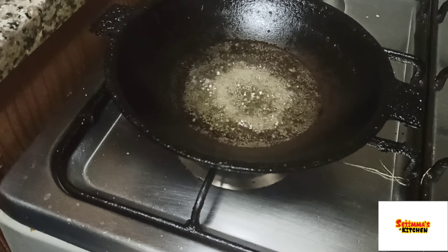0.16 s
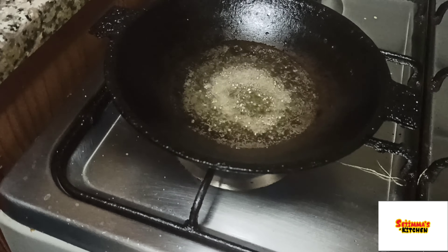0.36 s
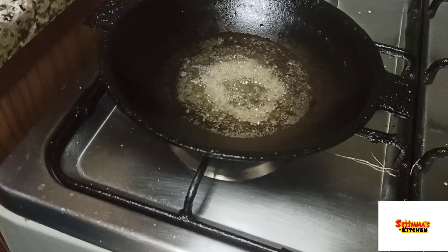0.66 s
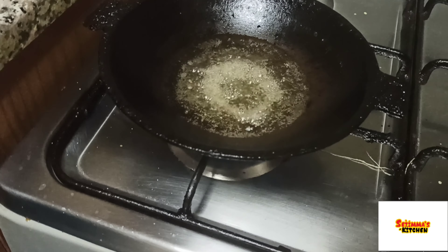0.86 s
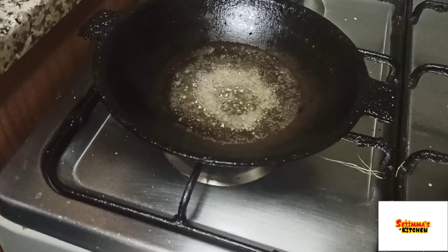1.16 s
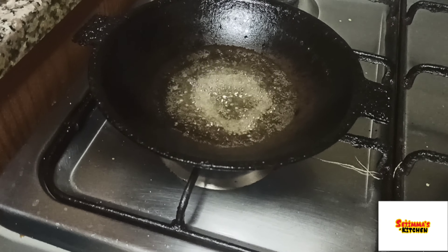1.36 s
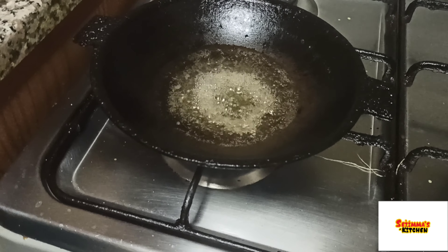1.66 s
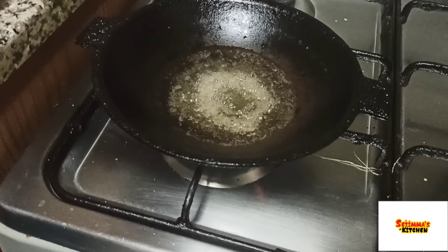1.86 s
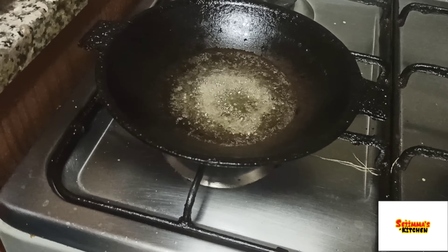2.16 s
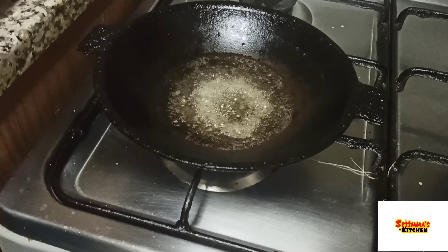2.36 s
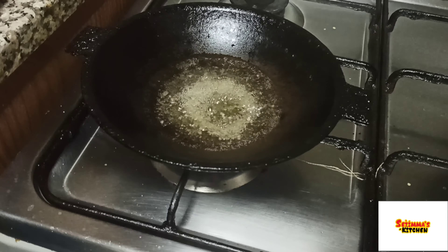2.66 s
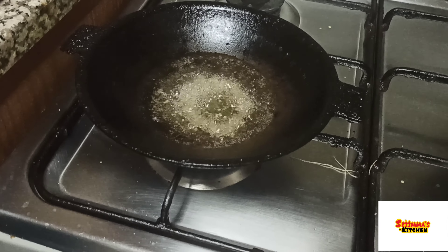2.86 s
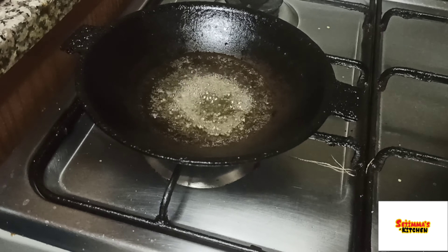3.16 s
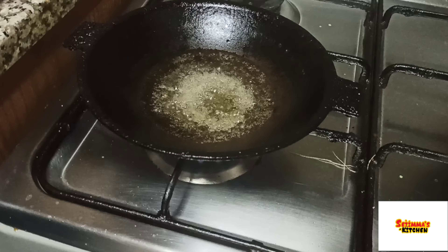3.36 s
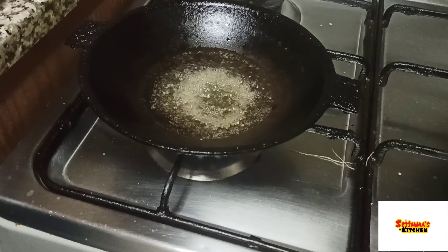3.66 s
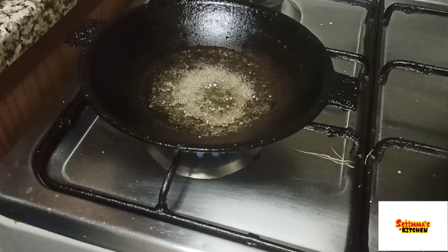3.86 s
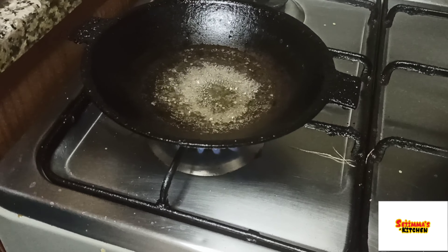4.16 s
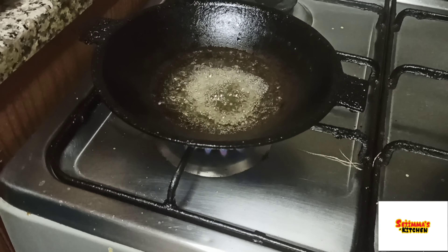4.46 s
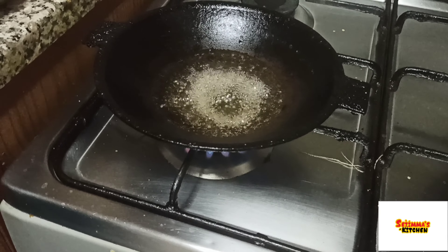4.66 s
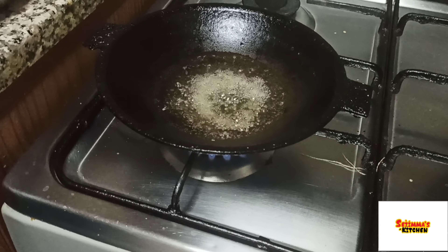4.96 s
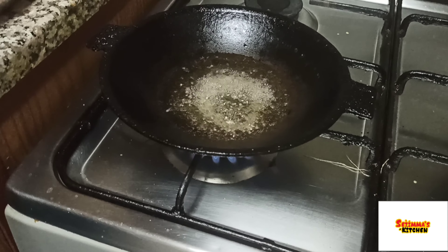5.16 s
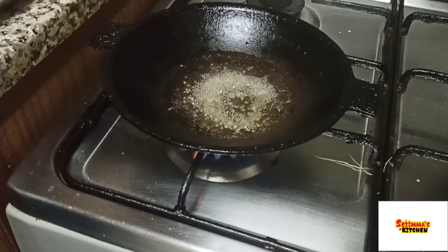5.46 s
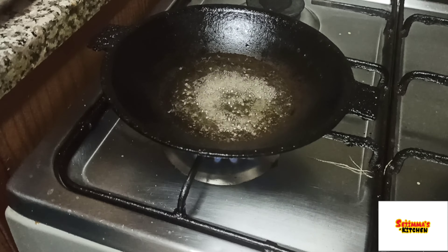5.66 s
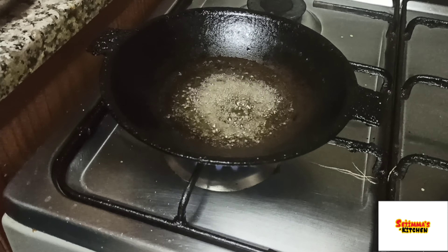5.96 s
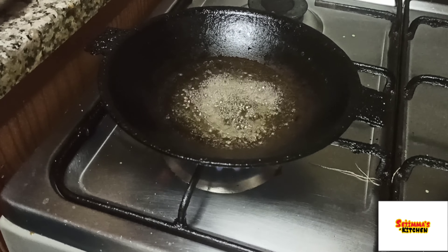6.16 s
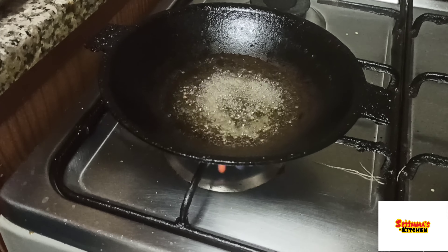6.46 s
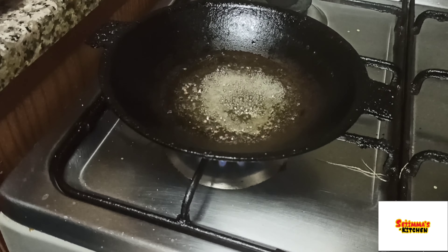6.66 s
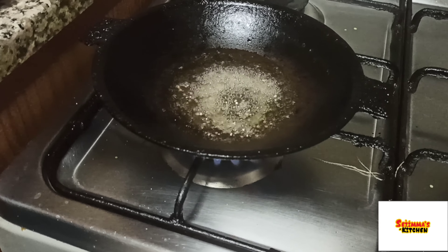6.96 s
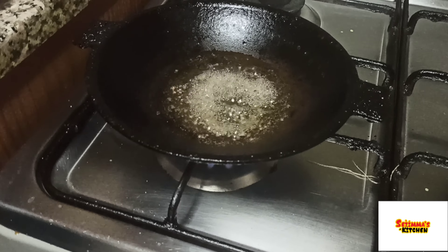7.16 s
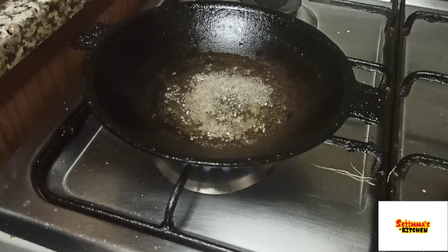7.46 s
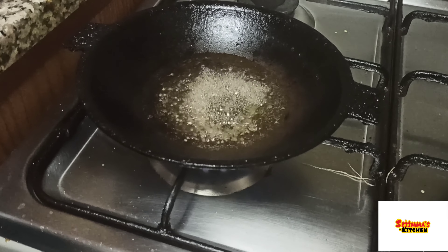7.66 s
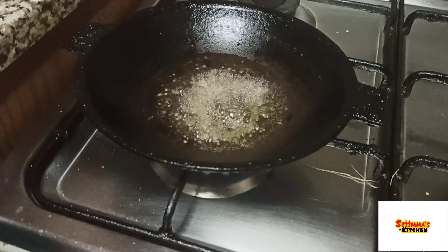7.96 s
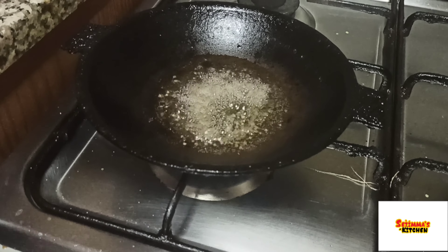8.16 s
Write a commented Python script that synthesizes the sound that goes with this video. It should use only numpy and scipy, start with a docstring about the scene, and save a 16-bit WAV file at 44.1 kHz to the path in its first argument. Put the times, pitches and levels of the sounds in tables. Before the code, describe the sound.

Mustard seeds pop in hot oil in an iron wok over a gas flame, heard in stereo from about an arm's length in a small hard-walled kitchen. A fine bubbling sizzle, a low soft burner roar, a faint breathy gas note and a mains hum lie quietly underneath throughout. Strong snaps open the scene at 0 to 0.1 s, with a short steam hiss; then sparse, uneven pops and small ticks follow, with harder cracks near 1.05, 2.6 and 3.45 s. Brief steam spits come around 2.6 and 5.3 s. From 3.7 s the crackle rapidly thickens and the sizzle rises. A soft low thump sits under a hard pop at about 4.6 s. Dry cracks, short ringing pocks, wet plops and sputters overlap ever more densely until the sound stops at about 8.3 s, still popping hard.

```python
"""Mustard seeds pop in hot oil in an iron wok on a gas stove, heard from about an arm's length in a small kitchen.
From the start a fine sizzle of bubbles lies over the burner's soft roar, a breathy gas note and a mains hum.
Pops come singly at first: each husk cracks and rings its pocket of vapour, and a few seeds vent a jet of steam.
From 3.7 s the pops crowd together and the sizzle swells; one low thump falls at about 4.6 s.
The wok colours every pop, and the kitchen walls scatter the sounds of the wok."""
import sys
import numpy as np
from scipy import signal
from scipy.fft import rfft, irfft, next_fast_len
from scipy.io import wavfile
from scipy.ndimage import uniform_filter1d

SR = 44100
rng = np.random.default_rng(int(sys.argv[2]) if len(sys.argv) > 2 else 0)


def put_to_file(sound):
    """Save the sound as 16-bit audio at rate SR, in the file named by the first command-line argument."""
    columns = np.atleast_2d(sound).T  # one column per channel
    safe = np.clip(columns, -1, 1)
    whole_steps = np.round(safe * 32767)
    wavfile.write(sys.argv[1], SR, whole_steps.astype(np.int16))


N = 366898
TIME = np.arange(N) / SR
# frequencies [Hz] for full-length sounds and for single pops; the added 1 Hz avoids log(0)
FREQ = np.fft.rfftfreq(2 * next_fast_len(N // 2 + 1), 1 / SR) + 1
SHORT_FREQ = np.fft.rfftfreq(2048, 1 / SR) + 1
BURST_FROM_S = 3.7  # the oil reaches the heat at which most seeds split
CALM_PER_S, RUSH_PER_S = 9, 24  # small pops per second before then, and added then


def seeds(gain_db=1.5, early_db=-19, early_s=.004):
    """The loud pops; from 3.7 s a much fainter pop comes a few milliseconds before each."""
    # the loudest bursting seeds: (time [s], crack level [dB], crack tilt [dB per octave], cavity pitch [Hz],
    # cavity ring against the crack [dB], plop of oil against the crack [dB], sputter against a unit click [dB])
    loud_pops = [(0.0049, 0, 6, 776, 3, -7, -26), (0.0705, 1.5, 1, 3500, 10, -20, -25),
                 (0.1248, -16.5, -6, 2750, 16.5, -6, -12), (0.236, -17, -5, 6000, 4, -3, -12),
                 (0.272, -19.5, 6.5, 6100, 14, 2, 0), (0.456, -6, -1.5, 5700, 3.5, -15, -15),
                 (0.5212, -25, 11, 3820, 22.5, 15, -16), (0.5306, -21.5, 2, 3640, 19, 8, -17),
                 (0.667, -19, 0, 2790, 10, 14.5, -10), (0.7271, -13.5, -2, 2300, 8, -8, 1),
                 (0.7406, -14.5, -1.5, 4330, 15, -11, -16), (0.8476, -21, 7, 5540, 0, 3, -14),
                 (1.0505, 2, 1.5, 3300, 9, -0.5, -8.5), (1.056, -15, 0, 1500, 2, -6, 3),
                 (1.615, -3.5, -0.5, 2100, 5.5, 7, -12), (1.8248, -8, 6, 3160, 12.5, -1, -6),
                 (1.872, -18, 7.5, 810, 1, -10, -11), (1.9399, -20, 6, 4800, 7, -12, -12),
                 (2.027, -7, -3, 3680, 2.5, -15, -10), (2.195, -18, -7.5, 6210, 8, -7, 1),
                 (2.2171, -13, 6.5, 3240, 17.5, -7, -24), (2.244, -18, -5, 6300, 14.5, 15.5, 5),
                 (2.348, -4.5, 7, 3340, 13, -19, -21), (2.5338, -25, 12.5, 6960, 22, -1, -21),
                 (2.5753, -16, -5.0, 2220, 15.5, 11, -16), (2.6075, -17.5, 4, 5450, 11, -12, -14),
                 (2.633, 1.5, 5.5, 810, -1, -7, -14), (2.6869, -1.5, -3.5, 6290, 0, -1, -6),
                 (2.7757, -17.5, -3, 4630, 5, -2, -14), (2.935, -3.5, -2, 3330, 6, 2, -28),
                 (3.0263, -16.5, 1, 4200, -5, -8, -16), (3.2122, -17, 2, 2000, 4, -8, -14),
                 (3.332, -15, 10.5, 3560, 18.5, -4, -18), (3.3814, -3, -3, 1590, 8.5, 6.5, -21),
                 (3.4585, 2.5, -1.5, 1790, 8, -9, -14), (3.5389, -12, 10.5, 4020, 30, -12, -35),
                 (3.5412, -21, 6, 3500, 16, -12, -22), (3.792, -26.5, 1, 4200, 13, -10, -12),
                 (4.016, -11.5, -3.5, 3200, 6.5, -5, -9), (4.0895, -24, 5, 4110, 17.5, -3, -19),
                 (4.104, -9.0, -3, 850, 16.5, -9, 1), (4.123, -10.5, -3, 5950, 10, -7, -18),
                 (4.2488, -12.5, -5, 9000, 9.5, -7, -5), (4.2745, -16, 1, 2000, 7, -4, -14),
                 (4.332, -5.5, 0.5, 1130, 10, -10, 1), (4.3795, -9.5, -2, 4970, 9.5, -15, -6),
                 (4.4374, -2, -2.5, 3520, -1, 4, -4), (4.4694, 4, -3.5, 1880, 11, -13, -16),
                 (4.5063, -9, 0.5, 4020, 7, -10, -21), (4.5617, 1.5, -0.5, 1500, 12, -9, -17),
                 (4.5653, 2.5, 1, 4540, 10.5, -14, -22), (4.635, 2.5, -0.5, 2460, 11, -12, -4),
                 (4.681, -9.5, -1.5, 2540, 10, 0, -13), (4.7217, -11, 0.5, 5040, 17.5, 18, -20),
                 (4.731, -7, -2, 2370, 4, -11, -19), (4.7867, -21, -9.5, 825, 24, 5, -12),
                 (4.884, -24, 7, 2100, 26, -14, -9), (4.903, -10.5, 6, 2860, 15, -13, -21),
                 (4.913, -3, -1.5, 1370, 13, -10, -14), (5.065, -9.5, -7, 5370, 11, 14, -6),
                 (5.0748, 2, -0.5, 4810, 3.5, 4, -26), (5.1687, -8.5, -2, 5440, 9, 11.5, -4),
                 (5.207, -5.5, -2, 3300, 3, 0, -7), (5.226, -14, 3, 5250, 10, 1, -14),
                 (5.2591, 0, 7, 810, -8, -4, -13), (5.3766, -3.5, -2, 3660, 4.5, 7, -7.5),
                 (5.541, -22, -8.5, 7140, 16, -13, -5), (5.5737, -3.5, 3, 2060, 9, -3, -8),
                 (5.5981, -7, 0, 5860, 13.5, 4, -26), (5.674, -6.5, -1.5, 1730, 13.5, -11, 1),
                 (5.7105, -5, -1.5, 2060, 10.5, -14, -4), (5.7954, -11.5, 2, 6270, 12.5, -3, -14),
                 (5.828, -6, 0, 1850, 7, -15, -8), (5.862, -1, 1, 2400, 2, 13, -14),
                 (5.9184, -20, -1, 3150, 14, 17, -4), (5.9588, -22.0, 9, 4970, 26.5, -8, -14),
                 (5.983, 4.5, -1.5, 1730, 3, 6, -28), (6.0037, -12, 4.5, 3700, 10, -8, -16),
                 (6.065, 0, 1, 8000, -3, -18, -23), (6.1194, -2.5, 3, 7550, 6, -20, -16),
                 (6.155, -1.5, 1.5, 3560, 6.5, -3, -16), (6.18, -9.5, -3.5, 810, 13, -11, -4),
                 (6.233, -13.5, -6, 2330, 15, 14, -10), (6.2438, -21, 7.5, 2130, 19.5, 3, -8),
                 (6.3856, -9, -1.5, 2400, 1, -6, -12), (6.426, 0, -1, 2630, 4.5, 0.5, -2),
                 (6.4914, -6, -4.5, 1800, 5, -11, -18), (6.571, 0.5, -0.5, 1550, 11.5, -14, -13),
                 (6.635, -10.5, 0, 3550, -2, 9, -7), (6.679, -1, 2, 3200, 9.5, -15, -8),
                 (6.6842, -2, 8.5, 2590, 7, -15, -4), (6.7123, -8, -6, 4620, 13.5, 17, -11),
                 (6.7476, -9.5, -5, 3180, 17, -8, -23), (6.799, -4, -3, 1020, 10, -10, -2),
                 (6.8103, -13.5, 6, 5800, 17, -1, -9), (6.8235, -9, 5, 880, 24.5, -7, -15),
                 (6.886, -8.5, -1.5, 2050, 5, -5, -18), (6.9358, -2, 1, 5100, 11, -13, -12),
                 (6.9908, -10, 2, 8190, 8, -15, 5), (7.0198, -7, -3, 2900, 9, 6.5, -15),
                 (7.093, -14, -3, 3870, 9, -3, -10), (7.1122, -13, 0, 1800, 7, 4, -18),
                 (7.131, -13, -2.5, 800, 22.5, -3, -13), (7.1338, -5, -4, 1760, 12.5, 3, -3),
                 (7.223, -10, 5, 4270, 19, 1, -6), (7.251, -10.5, 3, 4700, 12, 2, -10),
                 (7.301, -2, -2.5, 3640, 8, 6, -6), (7.3778, -10.5, -3.5, 2270, 19.5, 13, 13),
                 (7.4, -0.5, -2, 3050, 5, -9, -15), (7.4458, -3, 0, 1500, 14, -11, -16),
                 (7.4605, -5.5, -4.5, 5200, 3, 9, -15), (7.468, -3.5, -2.5, 3600, 10.5, -7, -2),
                 (7.5065, -6, 0.5, 3100, 9, -15, -16), (7.5366, -12.5, 8, 3380, 18, -1, -16),
                 (7.5934, -2, 1, 1900, 9.5, -15, 7), (7.622, -3, 0.5, 1650, 7.5, -15, -1),
                 (7.6728, -9, -4, 1550, 7, -13, -17), (7.6959, 1, 5.5, 4670, 11.5, -21, -20),
                 (7.751, -17, -7, 5790, 17, -6, -10), (7.83, -14, -6.0, 6130, 6, 8, -16),
                 (7.847, -10.5, -3.5, 1500, 4, 0, -12), (7.862, -12, -2.5, 3170, 9, 8, -10),
                 (7.8797, -11, -5.5, 3140, 1, -10, -9), (7.9097, -8.5, -5.5, 5740, 5, 9, -9),
                 (7.953, -12, -4, 3400, 17, 9.5, -28), (7.9993, 4.5, -1, 3900, 3, -5, -8),
                 (8.091, -14, 5, 3430, 10, -12, -17), (8.1205, -18.5, 3, 2820, 10, 17, -11),
                 (8.1416, 3, -0.5, 1700, 11, -14, -5), (8.187, -9.5, 0, 3230, 8, 9, 7),
                 (8.2317, 2, -4, 6260, -7, 7, -22), (8.266, -1, 1, 1710, 15.5, -11, -6),
                 (8.273, -10.5, 4.5, 2150, 13, 19.5, -7)]
    out = np.zeros((2, N))
    for s, crack_db, *seed in loud_pops:
        add(out, s, pop(crack_db, *seed))
        if s > BURST_FROM_S:
            lead_time = early_s * (.5 + rng.random())
            add(out, s - lead_time, pop(crack_db + early_db, *seed))
    return out * undb(gain_db)


def crackle(rate, size_db=-21, growth_db=1.2, spread_db=3.5, ring_db=6, plop_db=-3, sputter_db=-10,
            low_hz=950, high_hz=5500, tilt_db=0.5, tilt_spread_db=3.0):
    """Small pops and falling droplets at random, more and stronger as the oil heats."""
    out = np.zeros((2, N))
    for s in TIME[rng.random(N) < rate / SR]:
        size, tilt = np.clip(rng.standard_normal(2), -2, 2)
        heat_db = growth_db * np.log2(rate[int(s * SR)] / RUSH_PER_S)
        crack_db = size_db + heat_db + spread_db * size
        hz = low_hz * (high_hz / low_hz) ** rng.random()
        add(out, s, pop(crack_db, tilt_db + tilt_spread_db * tilt, hz, ring_db, plop_db, sputter_db))
    return out


def popping_rate(rise_s=.09, growth_per_s2=11):
    """Small pops per second: a few at first, then a rush that keeps growing as the oil heats."""
    hot = .5 + .5 * np.tanh((TIME - BURST_FROM_S) / (2 * rise_s))
    return CALM_PER_S + hot * (RUSH_PER_S + growth_per_s2 * np.maximum(TIME - BURST_FROM_S, 0))


def pop(crack_db, tilt_db, hz, ring_db, plop_db, sputter_db, low_hz=720, tear_db=-6.5, tear_s=0.00079,
        sputter_s=0.0052, bowl_db=0.0, bowl_s=0.005, bowl_hz=3000, bowl_treble_db=-6.0,
        lead_s=3.2e-5, lead_spread_s=1.8e-5):
    """One seed: a broad crack of the husk, a short cavity ring and a plop of oil, then quick echoes from bowl and hob."""
    cavity_q = 5.33  # the oil damps every vapour pocket alike
    plop_middle_hz, plop_q, plop_spread_octaves = 1220, 2.5, .07  # oil thrown aside; pitch varies with the splash
    snap_db_per_db = .45  # the harder a seed bursts, the more its husk gives way in one clean snap
    pan_middle_db, pan_spread_db = -0.5, 1  # left minus right, for seeds strewn about the middle of the wok
    f = SHORT_FREQ
    t = np.arange(2 * len(f) - 2) / SR

    octave = np.log2(f / 3000)
    crack = undb(tilt_db * octave - .8 * octave ** 2)
    # the vapour pocket rings for a few cycles
    ring = undb(ring_db) * np.sqrt(resonance(f, hz, cavity_q))
    plop_hz = plop_middle_hz * 2 ** (plop_spread_octaves * rng.standard_normal())
    plop = undb(plop_db) * np.sqrt(resonance(f, plop_hz, plop_q))
    # so small a source radiates little bass
    bass_loss = 1 + (low_hz / f) ** 5
    burst = undb(crack_db) * np.sqrt((crack ** 2 + ring ** 2 + plop ** 2) / bass_loss)

    # after the first snap the husk tears in several steps, and a wet seed goes on sputtering
    snap_db = snap_db_per_db * max(crack_db + max(ring_db, tilt_db, 0), 0)
    tearing = scatter(t, tear_s, tear_db - snap_db, channels=1)
    sputter = scatter(t, sputter_s, sputter_db, channels=1)
    torn = 0.5 + tearing + sputter

    # each pop has its own echo paths; long waves reach both microphones alike
    separate_echoes = scatter(t, bowl_s, bowl_db, channels=2)
    shared_echoes = scatter(t, bowl_s, bowl_db, channels=1)
    alike = 1 / (1 + (f / 900) ** 2)
    echoes = np.sqrt(alike) * shared_echoes + np.sqrt(1 - alike) * separate_echoes
    # short waves scatter away, so the treble keeps its first sharp spike
    echoes = echoes * undb(bowl_treble_db * f ** 2 / (f ** 2 + bowl_hz ** 2))

    # the direct sound usually reaches the left microphone first
    lead = lead_s + lead_spread_s * rng.standard_normal()
    arrival_s = 0.00011 + np.array([[-lead], [lead]]) / 2
    direct = np.exp(-2j * np.pi * f * arrival_s)
    pan_db = pan_middle_db + pan_spread_db * rng.standard_normal()
    pan = undb(np.array([[pan_db], [-pan_db]]) / 2)

    paths = torn * (direct + echoes)
    # tearing and echoes spread the burst in time and keep its broad colour
    spread = np.sqrt(uniform_filter1d(np.mean(np.abs(paths) ** 2, axis=0), size=30))
    fade = np.minimum(1, 2 - 2 * t / t[-1])
    return irfft(paths * causal(burst / spread)) * fade * pan


def thump(s=4.5655):
    """A soft low thump close to a hard pop: a few low tones that start together and fade fast."""
    # low tones: (frequency [Hz], starting level [dB], time to fade by 1/e [s])
    low_tones = [(42, -54, 0.012), (140, -40, 0.0042), (350, -34.5, 0.0028)]
    t = np.maximum(TIME - s, 0)
    return sum(undb(db) * np.sin(2 * np.pi * hz * t) * np.exp(-t / decay) for hz, db, decay in low_tones)


def steam():
    """Jets from split seeds: a sputtering hiss that dies as the pressure falls."""
    # steam jets: (start time [s], level before sputtering [dB], time to fade by 1/e [s])
    jets = [(.006, -23, 0.046), (2.553, -18.5, 0.0075), (2.632, -30, 0.027), (5.258, -21.5, 0.044),
            (6.687, -37, 0.025), (7.698, -28, 0.015)]
    # colour of escaping steam: (frequency [Hz], relative level [dB])
    steam_colour = [(500, -12), (2500, -7), (5000, 3), (7500, 1), (12000, 11), (16000, 5.5)]
    flow = sum(undb(db) * (TIME >= s) * np.exp(-np.abs(TIME - s) / fade) for s, db, fade in jets)
    unsteady = level(uniform_filter1d(rng.standard_normal(N), size=90), 0)
    sputter = undb(2 * unsteady)
    hiss = filtered(stereo_noise(-1.9), colour(steam_colour, FREQ))
    return flow * sputter * level(hiss, 0)


def sizzle(heat_db, rate=8000, sizzle_db=-49.5, seethe_db=0.9):
    """Countless tiny vapour bubbles bursting around the seeds merge into a seething hiss."""
    # colour of frying oil: (frequency [Hz], relative level [dB])
    oil_colour = [(500, -13), (2500, -12), (3550, 2.5), (4500, -0.5), (5400, -1), (6350, 6), (6900, -5),
                  (8000, 0), (12000, 7.5), (16000, 1)]
    bursts = rng.random(N) < rate / SR  # rate in bubbles per second
    size = bursts * undb(3 * np.minimum(rng.exponential(size=N), 4))
    seethe = np.interp(TIME, np.linspace(0, N / SR, num=200), rng.standard_normal(size=200))
    hiss = filtered(size * stereo_noise(-0.17), colour(oil_colour, FREQ))
    return level(hiss, sizzle_db) * undb(heat_db + seethe_db * seethe)


def burner(roar_db=-49.5, hum_db=-63, hum_hz=100):
    """The gas flame's gently unsteady roar, and a mains hum in the kitchen."""
    # colour of flame and kitchen rumble: (frequency [Hz], relative level [dB])
    flame_colour = [(20, -19), (45, -28), (65, -10), (90, -2.5), (115, 3), (165, -8.5), (220, 1), (290, -1),
                    (430, -11), (800, -12.5), (1500, -15.5), (2500, -21.5), (6000, -20)]
    # resonances of the burner and the space under the wok: (frequency [Hz], width [Hz], lift [dB])
    burner_modes = [(488, 18.6, 8.5), (659, 69, 7.5), (1070, 96, 5)]
    roar = filtered(stereo_noise(-8.0), colour(flame_colour, FREQ) * lift(burner_modes))
    flicker = np.interp(TIME, np.linspace(0, N / SR, num=60), rng.standard_normal(size=60))
    hum = level(np.sin(2 * np.pi * hum_hz * TIME), hum_db)
    both = level(roar, roar_db) * undb(.5 * flicker) + hum
    return both * undb(np.array([[.4], [-.4]]))  # slightly louder on the left


def gas_note(note_db=-59.0, octave_db=-12, width_hz=170, waver_hz=45, waver_per_s=7, waver_db=1.0):
    """A breathy band of hiss from the gas flow and its faint octave, drifting and wavering in pitch."""
    # slow drift of the note, before the waver: (time [s], frequency [Hz])
    note_path = [(0, 1852), (1.4, 1850), (2.1, 1860), (2.8, 1884), (3.4, 1796), (8.3, 1805)]
    centre = note_path[0][1]
    waver = np.interp(TIME * waver_per_s, np.arange(200), rng.standard_normal(size=200))
    drift = np.interp(TIME, *np.transpose(note_path)) - centre + waver_hz * waver
    out = 0
    for k, db in ((1, note_db), (2, note_db + octave_db)):
        band = filtered(stereo_noise(-2), resonance(FREQ, k * centre, centre / width_hz))
        # the complex form lets the whole band slide up and down by the drift
        band = signal.hilbert(band, len(FREQ) * 2 - 2)[:, :N]
        slide = np.exp(2j * np.pi * k * np.cumsum(drift) / SR)
        out = out + level(np.real(band * slide), db)
    return out * undb(waver_db * waver)


def kitchen(x, wet_db, gap_s, count):
    """Diffuse echoes of hard walls, fading by pitch band; the pattern changes as the hand-held microphone drifts."""
    # kitchen echoes: (frequency [Hz], time to fade by 60 dB [s], relative level [dB])
    wall_bands = [(500, 0.31, -4.5), (870, 0.35, -1.5), (1210, 0.32, -2), (2240, 0.32, 4.5), (3630, 0.4, 0),
                  (6860, 0.43, 0), (13900, 0.3, 5)]
    t = np.arange(SR * 3 // 5) / SR
    f = np.fft.rfftfreq(len(t), 1 / SR)
    hz, t60, band_db = np.transpose(wall_bands)
    # each band blends into its neighbours and has its own decay
    bands = [(np.interp(f, hz, weights), undb(-60 * t / fade))
             for weights, fade in zip(np.diag(undb(band_db)), t60)]
    out = np.zeros((2, N))
    # each stretch of sound gets a fresh echo pattern
    for stretch in np.array_split(np.arange(N), count):
        noise = rfft(rng.standard_normal((2, len(t))))
        tail = sum(irfft(noise * band, len(t)) * decay for band, decay in bands) * (t > gap_s)
        tail *= undb(wet_db) / np.sqrt(np.sum(tail ** 2) / 2)
        add(out, TIME[stretch[0]], signal.fftconvolve(x[:, stretch], tail, axes=1))
    return out


def undb(db):
    """Decibels to gain."""
    return 10 ** (np.asarray(db) / 20)


def level(x, db):
    """Scale to an rms level."""
    return x * undb(db) / np.sqrt(np.mean(x ** 2))


def colour(points, f):
    """Gain at frequencies f of a (frequency [Hz], level [dB]) spectrum."""
    hz, db = np.transpose(points)
    return undb(np.interp(np.log(f), np.log(hz), db))


def resonance(f, hz, q):
    """Power response of one resonance, 1 at its centre; a higher q makes it narrower."""
    return 1 / (1 + (q * (f / hz - hz / f)) ** 2)


def lift(modes):
    """Gain of a few (frequency [Hz], width [Hz], lift [dB]) resonances added to a flat response."""
    return 1 + sum((undb(db) - 1) * resonance(FREQ, hz, hz / width) for hz, width, db in modes)


def causal(gain):
    """Spectrum of the sharpest-starting impulse that has this gain."""
    cep = irfft(np.log(gain + 1e-6))
    half = len(cep) // 2
    # folding the second half onto the first leaves nothing before the start
    cep[1:half] *= 2
    cep[half + 1:] = 0
    return np.exp(rfft(cep))


def filtered(x, gain):
    """Colour a full-length sound by a gain for each frequency."""
    return irfft(rfft(x, 2 * len(gain) - 2) * gain)[:, :N]


def scatter(t, decay_s, db, channels):
    """Spectra of dying showers of unequal clicks, each shower with energy db."""
    shape = (channels, len(t))
    sizes = rng.standard_normal(shape) * rng.exponential(size=shape)
    clicks = sizes * np.exp(-t / decay_s) * (t > .0003)
    return rfft(clicks * undb(db) / np.sqrt(np.sum(clicks ** 2, axis=1, keepdims=True)))


def stereo_noise(side_db):
    """White noise with a shared part and a part that is opposite on the two sides."""
    mid, side = rng.standard_normal((2, N))
    return mid + undb(side_db) * side * np.array([[1], [-1]])


def add(out, s, x):
    """Mix a stereo sound in at time s."""
    i = int(np.clip(s * SR, 0, N - 1))
    out[:, i:i + x.shape[1]] += x[:, :N - i]


def scene():
    """The wok in its kitchen, over the flame; the popping rate drives both crackle and sizzle."""
    # the iron bowl colours every pop with its peaks and dips: (frequency [Hz], width [Hz], lift [dB])
    wok_modes = [(642, 100, 6.5), (804, 190, -14), (930, 6.5, 7), (1083, 154, 6.5), (1338, 31, 6.5),
                 (1986, 51, 4), (2655, 410, -4), (4630, 760, 3)]
    rate = popping_rate()
    # the oil seethes louder as the pops get denser: 1.03 dB for each doubling
    heat_db = 1.03 * np.log2(rate / CALM_PER_S)
    pops = filtered(seeds() + crackle(rate), causal(lift(wok_modes)))
    wok = pops + steam() + sizzle(heat_db)
    echoes = kitchen(wok, wet_db=-3.5, gap_s=0.0051, count=20)
    return wok + echoes + burner() + gas_note() + thump()


def record(dry):
    """The treble takes on an overall colour, and a steep filter cuts the top above 16.5 kHz."""
    # overall treble colour: (frequency [Hz], level [dB]); a notch near 5 kHz, little sound from 9 to 11.5 kHz
    treble_colour = [(2600, 0), (3300, 2), (4300, 3.5), (4600, 2), (4850, -7), (5100, -2.5), (5900, -2.5),
                     (6250, 5.5), (7600, 5), (8450, -1), (8900, -17), (9400, -28), (10600, -34),
                     (11300, -42), (11650, -9), (15300, -11), (16000, -30)]
    response = irfft(causal(colour(treble_colour, SHORT_FREQ)))
    heard = signal.fftconvolve(dry, response[None], axes=1)[:, :N]
    return signal.sosfilt(signal.ellip(8, .2, 70, 16500, fs=SR, output="sos"), heard)


dry = scene()
out = record(dry)
put_to_file(out)
```